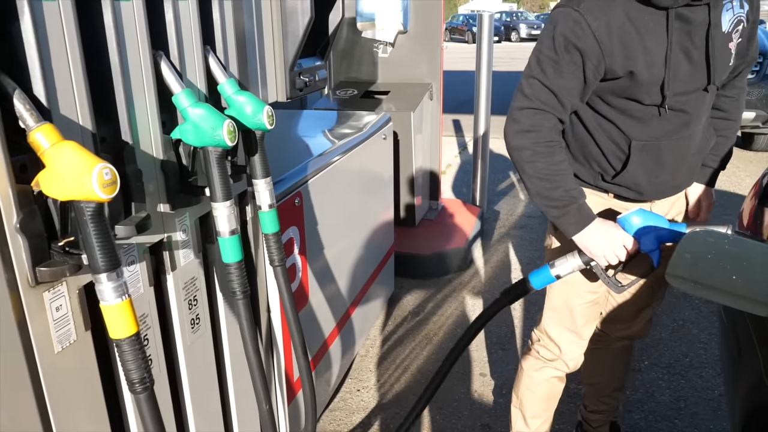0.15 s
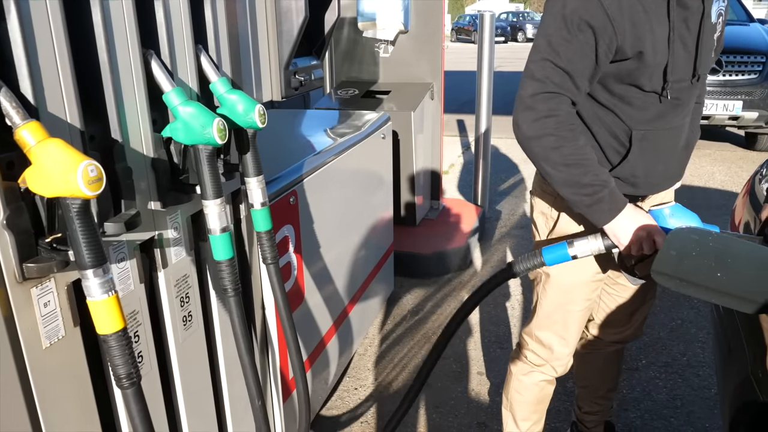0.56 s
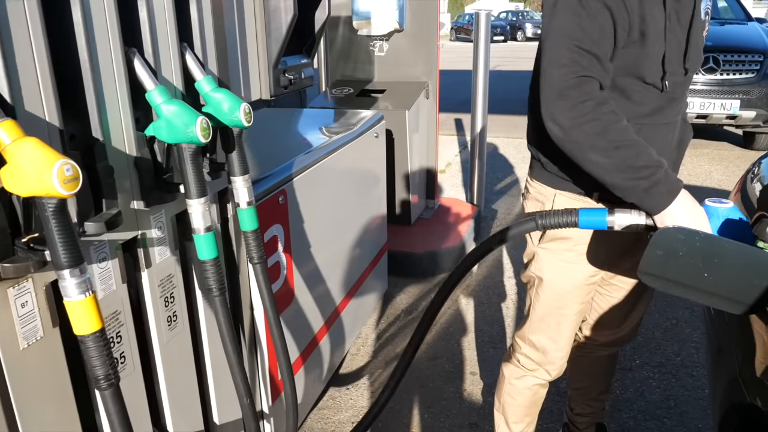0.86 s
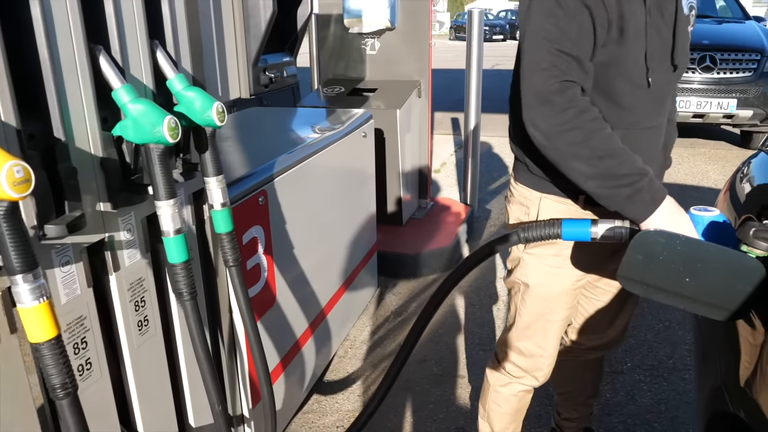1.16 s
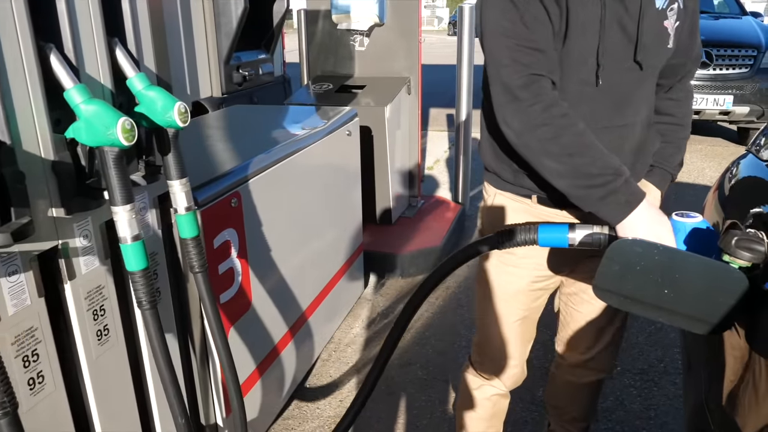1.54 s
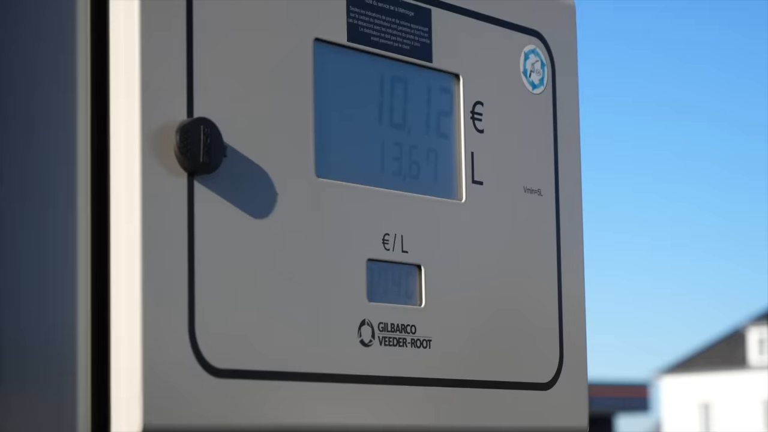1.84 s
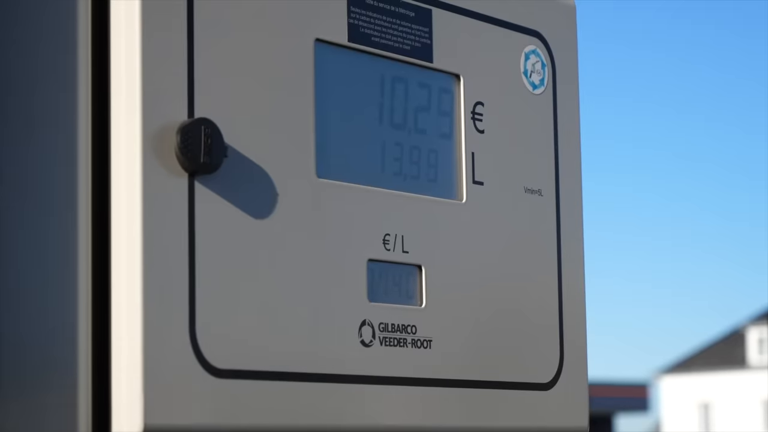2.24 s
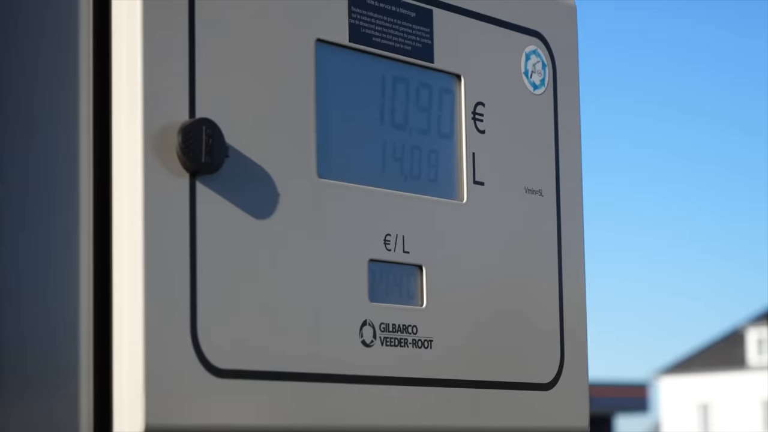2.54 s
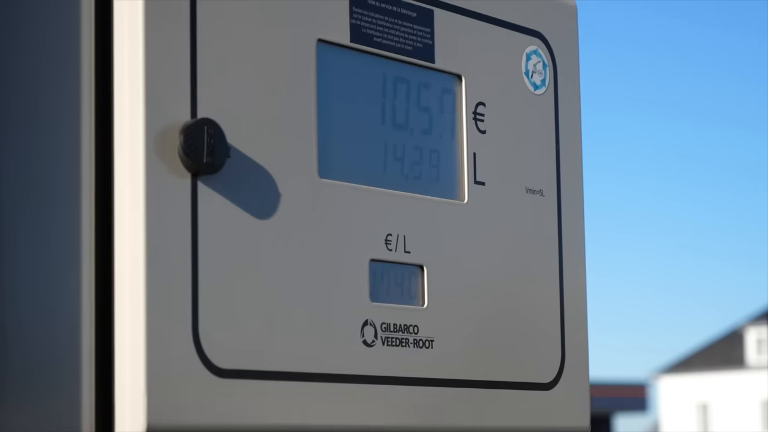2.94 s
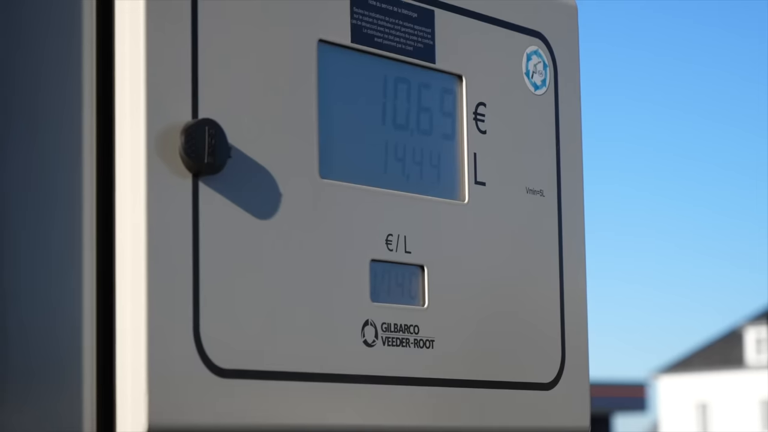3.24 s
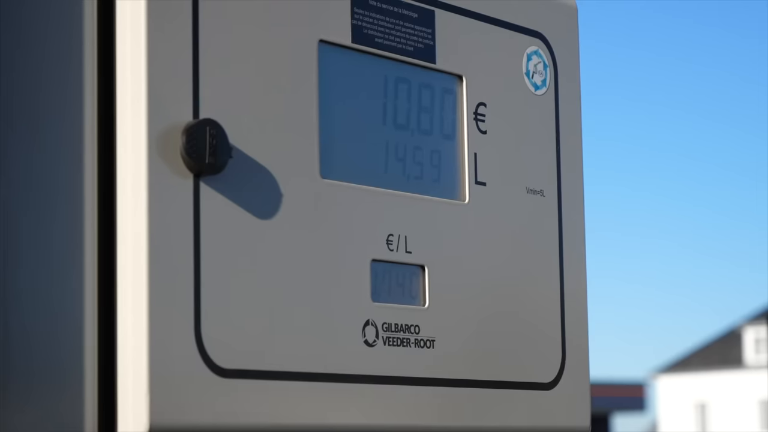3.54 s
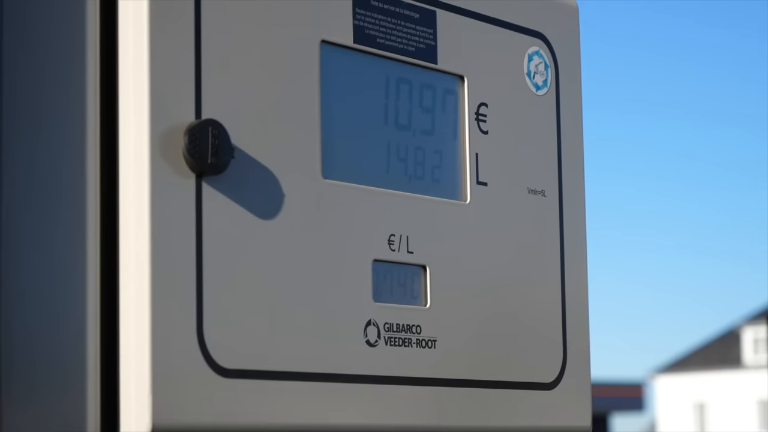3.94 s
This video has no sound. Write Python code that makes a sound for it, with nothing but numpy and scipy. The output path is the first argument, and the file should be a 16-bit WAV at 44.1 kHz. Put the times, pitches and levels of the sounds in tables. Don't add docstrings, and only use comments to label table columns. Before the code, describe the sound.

First, swelling traffic rumble with a faint engine idle and light metallic taps, building to a rattling cluster of hollow knocks as the nozzle goes in, then a sharp click. After a quarter-second gap, a steady dispenser hum with airy fuel rush and resonant panels, heard close, continues to the end; a low engine tone sinks and fades behind it.

```python
import sys
import numpy as np
from scipy import signal
from scipy.fft import rfft, irfft
from scipy.io import wavfile
from scipy.ndimage import uniform_filter1d

SR = 44100
rng = np.random.default_rng(int(sys.argv[2]) if len(sys.argv) > 2 else 0)


def master(y):
    cut = np.clip(np.atleast_2d(y).T, -1, 1)
    pcm = np.round(cut * 32767)
    wavfile.write(sys.argv[1], SR, pcm.astype(np.int16))


def boost_factor(decibels):
    exponent = np.asarray(decibels, float) / 20
    return 10 ** exponent


N = 180622
CUT_S, RESUME_S = 1.6265, 1.8955


# t/s, tick level/dB, ring f/Hz, ring t60/s, broad crack level/dB
TICKS = [(.4637, -32, 3100, .022, -11), (0.5328, -29, 3320, .023, -7.5), (0.539, -39, 3300, .018, -11.5),
         (.5919, -22, 1590, .06, -9), (.5922, -31, 5660, .015, -3), (0.5927, -22, 5140, .02, -11),
         (.5944, -26.5, 3560, .05, -8), (0.595, -40, 6740, .03, -6.5), (0.597, -25, 2770, .03, -4),
         (.6065, -32, 3610, .04, -9), (0.768, -22.5, 5220, .012, -9), (.7688, -27, 3410, .02, -10.5),
         (.7722, -27, 4980, .03, -3.5), (.773, -44, 11300, .03, -10), (.781, -34.5, 5080, .04, -10),
         (0.786, -36, 4980, .04, -13), (.9047, -21.5, 5630, .018, -13), (.907, -25.5, 4500, .02, -14),
         (0.912, -24.5, 3940, .018, -20), (0.92, -25.5, 5320, .025, -17.5), (.927, -29.5, 4470, .014, -12),
         (0.9357, -19, 4100, .02, -16), (0.9379, -21.5, 3020, .015, -16.5), (.9415, -26, 5180, .035, -13),
         (.942, -43, 9850, .04, -11.5), (.9435, -39.5, 11400, .035, -12.5), (.948, -17.5, 2494, .025, -19),
         (.953, -31.5, 5420, .02, -14), (.971, -37, 2440, .04, -11), (1.2007, -28, 3730, .016, -7),
         (1.2012, -40, 6750, .02, -5), (1.204, -28, 3700, .045, -14), (1.212, -39, 6700, .02, 2),
         (1.5665, -13.5, 4100, .0035, -9), (1.5681, -25.5, 4210, .004, -7), (1.5692, -30, 5050, .03, -4),
         (1.571, -37, 9230, .03, -8)]
# t/s, blow level/dB, centre of the blow's colour f/Hz
KNOCKS = [(.5328, -23, 1200), (.5392, -16, 1200), (.5921, -16.5, 1600), (.5995, -23.5, 1400),
          (.6015, -18, 600), (.7685, -24.5, 900), (.9047, -7.5, 1450), (.9072, -11, 480), (0.9094, -7, 800),
          (0.9113, -16.5, 600), (0.9158, -11, 480), (.9185, -11, 950), (0.923, -12, 1200),
          (.9255, -10.5, 753), (.931, -15.5, 1600), (.9352, -12.5, 1650), (.9385, -16.5, 1350),
          (.944, -14.5, 480), (.948, -8, 1010), (0.9495, -17.5, 1600), (.952, -19, 1200),
          (.958, -18.5, 1200), (.967, -19.5, 1000), (.973, -21.5, 1450), (1.143, -19.5, 600),
          (1.2015, -28, 600), (1.5695, -29, 600)]


def nozzle():
    out, t = np.zeros(N), np.arange(SR // 3) / SR
    for s, *row in TICKS:
        add(out, s, tick(t, *row))
    for s, *row in KNOCKS:
        add(out, s, knock(t, *row))
    small_parts = signal.butter(2, 150, 'highpass', fs=SR, output='sos')
    out = signal.sosfilt(small_parts, out)
    canopy = rng.choice([-1., 0, 1.], len(t), p=[.03, .94, .03])
    canopy = canopy * boost_factor(-60 * t / 0.12) * (t > .003)
    return out + boost_factor(-11) * signal.fftconvolve(out, canopy / np.linalg.norm(canopy))[:N]


# ratio to the tick's ring, level/dB
SPOUT = [(.7, -17), (0.948, 2.5), (1, 2.5), (1.08, 0), (1.3, -10.5), (1.42, -20)]


def tick(t, tick_db, hz, t60, crack_db):
    touch_s = .00045
    chatter, hiss = rng.standard_normal((2, len(t)))
    spout = sum(boost_factor(db) * np.sin(2 * np.pi * ratio * hz * t) for ratio, db in SPOUT)
    strike = chatter * np.exp(-t / 0.00025) + 9 * (t == 0)
    ring = signal.fftconvolve(strike, spout * boost_factor(-60 * t / t60))[:len(t)]
    ring = ring * (1 - np.exp(-(t / touch_s) ** 2))
    snap = 0.7 * np.diff(hiss, prepend=0) * np.exp(-t / 0.0012)
    hiss = signal.lfilter([1, -.7, -.3], [1, -1.2, .5], hiss)
    crack = evened(hiss) * (np.exp(-t / 0.0049) + 0.14 * np.exp(-t / 0.022))
    return boost_factor(tick_db) * (ring / abs(ring).max() + boost_factor(crack_db) * 0.23 * (crack + snap))


# f/Hz, level/dB, t60/s
NECK = [(300, -7.5, 0.038), (397.7, -6, .09), (506, -0.5, .08), (623, -2, 0.043), (761, -0.5, .045),
        (857, -8, .05), (1000, -1.5, .04), (1186, -2, 0.032), (1320, -1.5, .03), (1400, -0.5, .026),
        (1540, -3, .04), (1620, 2, 0.022), (1790, -12.5, .04), (2400, -8.5, .029)]


def knock(t, blow_db, centre_hz):
    sides = rng.choice([-1, 1]) * (-1) ** np.arange(len(NECK))
    spread_db = 1.2 * rng.standard_normal(len(NECK))
    neck = np.zeros(len(t))
    for (f, db, t60), side, extra_db in zip(NECK, sides, spread_db):
        off_colour_db = 13.5 * np.log2(f / centre_hz) ** 2
        fading = boost_factor(db + extra_db - off_colour_db - 60 * t / t60)
        neck += side * fading * np.sin(2 * np.pi * f * t)
    neck = neck * (1 - np.exp(-t / 0.0003))
    scrape = signal.lfilter([1, 0, -1], [1, -1.45, .7], rng.standard_normal(len(t)))
    return boost_factor(blow_db) * (0.5 * neck + 0.04 * evened(scrape) * np.exp(-t / 0.006))


def dispenser():
    t = np.maximum(np.arange(N) / SR - RESUME_S, 0)
    return motor() + fuel(t) + leaving_engine(t)


# ratio to the shaft speed, level/dB
SHAFT_ORDERS = [(3, -39), (4, -44.5), (5, -52), (7, -45.5), (9, -44), (10, -51), (13, -49.5),
                (16.17, -43.5), (18.05, -46.5), (45.02, -48.5)]


def motor():
    vane_hz, vanes = 144.9, 3
    waver_db, drift = 4, 0.00505
    shaft_hz = vane_hz / vanes * (1 + 0.0013 * wander(5.07))
    hum = np.zeros(N)
    for order, db in SHAFT_ORDERS:
        stray = 1 + drift * np.tanh(order / 12) * wander(9)
        hum += boost_factor(db) * tone(order * shaft_hz * stray, waver_db * np.tanh(order / 8) ** 2, 11)
    return hum


# f/Hz, level/dB per Hz
FLOW = [(20, -52), (38, -39), (50, -9), (100, -13.5), (140, -7.5), (300, -12.5), (450, -8), (1000, -9.5),
        (1700, -12.5), (1950, -15), (3300, -16.5), (5000, -24.5), (9000, -33), (15700, -41)]
# f/Hz, width/Hz, level/dB
CABINET = [(69.5, 5.6, -55.5), (160.3, 14, -50.5), (253, 57, -48.5), (383.8, 7.3, -51.5), (533, 5.5, -50),
           (650, 21, -55), (775, 63, -51), (905, 62, -49), (950, 25, -46), (1053, 10, -48.5),
           (1261, 8, -49), (1610, 83, -43), (2085, 74, -54.5), (2325, 53, -46.5), (2610, 35, -53),
           (2800, 27, -76), (3228, 29, -50.5), (3716, 45, -52.5), (4160, 45, -53), (5680, 170, -55.5)]


def fuel(t):
    flow_db, sag_db_per_s = -31, 0.27
    return boost_factor(flow_db - sag_db_per_s * t) * wash(FLOW, 0.72) + rung(CABINET)


def leaving_engine(t):
    start_hz, sag_hz_per_s2 = 115.4, 0.39
    start_db, fade_db_per_s = -41.5, 7
    return boost_factor(start_db - fade_db_per_s * t) * tone(start_hz - sag_hz_per_s2 * t ** 2, 0.58)


def engine():
    idle_hz, start_excess_hz, settle_s = 73.95, 5.4, 0.061
    firing_db, rise_s, fade_db_per_s = -45, 0.08, 5.5
    loaded_db, unloaded_db, unload_s, unload_span_s = -40, -50, .57, 0.081
    t = np.arange(N) / SR
    firing = (1 - np.exp(-(t / rise_s) ** 2)) * boost_factor(firing_db - fade_db_per_s * t)
    load = (1 - np.tanh((t - unload_s) / unload_span_s)) / 2
    fifth_db = unloaded_db + (loaded_db - unloaded_db) * load
    hz = idle_hz + start_excess_hz * np.exp(-t / settle_s)
    return firing * tone(hz, 0.58) + boost_factor(fifth_db) * tone(5.05 * idle_hz + 0 * t, 0.9)


# f/Hz, width/Hz, level/dB
INJECTORS = [(13620, 320, -69), (14900, 250, -75)]


def injectors():
    puffs_per_s, one_puff_s = 17.3, .231
    since = (np.arange(N) / SR - one_puff_s) % (1 / puffs_per_s)
    return rung(INJECTORS) * evened(.1 + np.exp(-since / .009))


# t/s, roar level/dB
TRAFFIC = [
    (0, -32),
    (.3, -29.5),
    (.6, -30),
    (.9, -33.5),
    (1.15, -32),
    (1.4, -35),
    (1.63, -32.5),
]
# f/Hz, level/dB per Hz
STREET = [(20, -56.5), (40, -34.5), (60, -16), (100, -12), (125, -5), (200, 0), (400, -4.5), (1000, -10.5),
          (1300, -18), (2000, -20.5), (4200, -27.5), (6500, -35.5), (9000, -43), (15700, -47)]
# f/Hz, width/Hz, level/dB, growth/dB per s as the traffic moves
STREET_BOOMS = [(170, 24, -36.5, -2), (320.4, 13, -41, -4.5), (497, 110, -63, 17), (635, 12, -43, -7.5),
                (909, 300, -38, -7)]


def street():
    usual_roar_db = -32
    rumble_db, rumble_follows = -2, .15
    hiss_db, hiss_follows = 3, .05
    t = np.arange(N) / SR
    roar_db = np.interp(t, *np.transpose(TRAFFIC))
    hz = np.fft.rfftfreq(1024, 1 / SR)[:, None]
    frame_starts = np.minimum(np.arange(N // 256 + 5) * 256, N - 1)
    swing_db = roar_db[frame_starts] - usual_roar_db
    low_db = rumble_db + (rumble_follows - 1) * swing_db
    high_db = hiss_db + (hiss_follows - 1) * swing_db
    tilt_db = low_db / (1 + (hz / 350) ** 4) + high_db / (1 + (1500 / (hz + 1)) ** 4)
    roar = boost_factor(roar_db + 2.0) * wash(STREET, 1.04, tilt_db)
    booms = sum(boost_factor(growth_db * t) * rung([boom]) for *boom, growth_db in STREET_BOOMS)
    return roar + booms


def evened(x):
    return x / np.sqrt(np.mean(x ** 2) + 1e-20)


def add(mix, s, sound):
    part = mix[round(s * SR):][:len(sound)]
    part += sound[:len(part)]


def read(points, hz):
    f, value = np.transpose(points)
    return np.interp(np.log(hz + 1), np.log(f + 1), value)


def wander(rate_hz):
    t = np.arange(0, N / SR + .02, .01)
    rates = np.geomspace(rate_hz / 10, rate_hz, 12)
    slow = sum(np.sin(2 * np.pi * (f * t + rng.random())) for f in rates)
    return np.interp(np.arange(N) / SR, t, evened(slow))


def tone(hz, waver_db, waver_hz=4.0):
    turns = np.cumsum(hz) / SR + rng.random()
    return np.sqrt(2) * np.sin(2 * np.pi * turns) * boost_factor(waver_db * wander(waver_hz))


def wash(spectrum, patchy_db, tilt_db=0):
    frames, hz = N // 256 + 5, np.fft.rfftfreq(1024, 1 / SR)
    a, b, patches = rng.standard_normal((3, len(hz), frames))
    patches = uniform_filter1d(patches, size=8, axis=0)
    patches = evened(uniform_filter1d(patches, size=12, axis=1))
    z = (a + 1j * b) * boost_factor(read(spectrum, hz)[:, None] + patchy_db * patches)
    plain = signal.istft(z, nperseg=1024, noverlap=768)[1]
    bent = signal.istft(z * boost_factor(tilt_db), nperseg=1024, noverlap=768)[1]
    return bent[:N] / np.std(plain)


def rung(modes):
    hz, z = np.fft.rfftfreq(N, 1 / SR), rfft(rng.standard_normal(N))
    shape = np.zeros(len(hz))
    for f, width, db in modes:
        shape += boost_factor(db) * evened(1 / (1 + (2 * (hz - f) / width) ** 2))
    return irfft(z * shape, N)


def scene():
    t = np.arange(N) / SR
    first = nozzle() + engine() + injectors() + street()
    second = dispenser()
    after = np.maximum(t - CUT_S, 0)
    dull = signal.sosfilt(signal.butter(6, 1200, fs=SR, output='sos'), first)
    smear = (first * (after < .01) + dull * (after < .034)) * boost_factor(-50 - 550 * after)
    lead = (t > RESUME_S - .004) * boost_factor(np.minimum(-20 + 9000 * (t - RESUME_S), 0))
    mono = np.where(t < CUT_S, first, smear) + second * np.where(t < RESUME_S, lead, 1)
    return np.array([mono, mono])


# f/Hz, threshold/sigma
RARITY = [(60, 1.1), (400, 1.8), (2000, 1.9), (5000, 2.1), (9000, 2.1), (12000, 1.5), (14500, 1.05),
          (16000, 1.6)]
# f/Hz, side minus mid level/dB
DIFFERENCE = [(60, -15), (400, -11), (2000, -18), (5000, 6), (9000, -8.5), (15000, -4)]


def thin_and_part(mono):
    edge_hz = 15580
    hz, _, z = signal.stft(mono, SR, nperseg=1536)
    column_hz = hz[:, None]
    chance, blocks = rng.standard_normal((2, *z.shape))
    turns = rng.random(z.shape)
    band = np.sqrt(abs(uniform_filter1d(abs(z) ** 2, size=24, axis=0)))
    chance = uniform_filter1d(chance, size=6, axis=0)
    chance = evened(uniform_filter1d(chance, size=3, axis=1))
    treble = (band[hz > 8000] ** 2).mean(0)
    calm = treble < 1.7 * signal.medfilt(treble, kernel_size=15)
    step = calm * boost_factor(3.5 * chance) * 1.2 / (1 + (8000 / (column_hz + 1)) ** 4)
    z = z * (abs(z) > step * band) / (1 + (column_hz / edge_hz) ** 200)
    blocks = evened(uniform_filter1d(blocks, size=3, axis=1))[np.arange(len(hz)) // 20]
    parted = calm * (blocks > read(RARITY, hz)[:, None])
    side = abs(z) * parted * boost_factor(read(DIFFERENCE, hz)[:, None]) * np.exp(2j * np.pi * turns)
    return signal.istft(np.array([z, side]), SR, nperseg=1536)[1][:, :N]


def roll_off(x):
    return signal.sosfilt(signal.butter(12, 15830, fs=SR, output="sos"), x)


def record(dry):
    limited = .6 * np.tanh(dry[0] / .6)
    mid, side = thin_and_part(limited)
    power = uniform_filter1d(np.array([limited, mid]) ** 2, size=128, axis=1)
    hush = np.minimum(1, 3 * np.sqrt(abs(power[0] / (power[1] + 1e-14))))
    return roll_off(hush * np.array([mid + side, mid - side]))


dry = scene()
out = record(dry)
master(out)
```